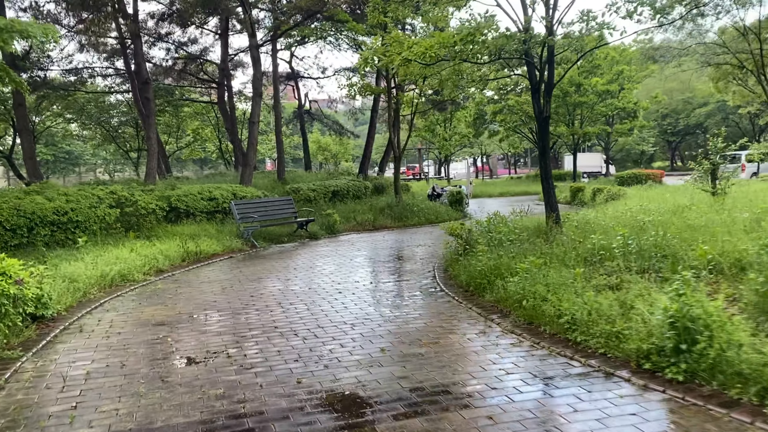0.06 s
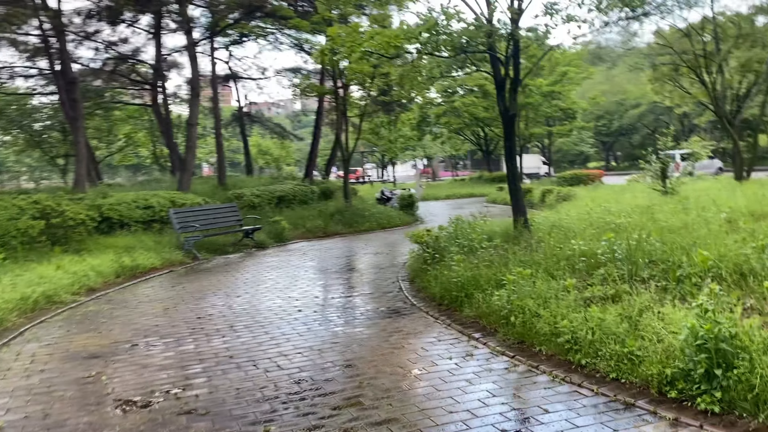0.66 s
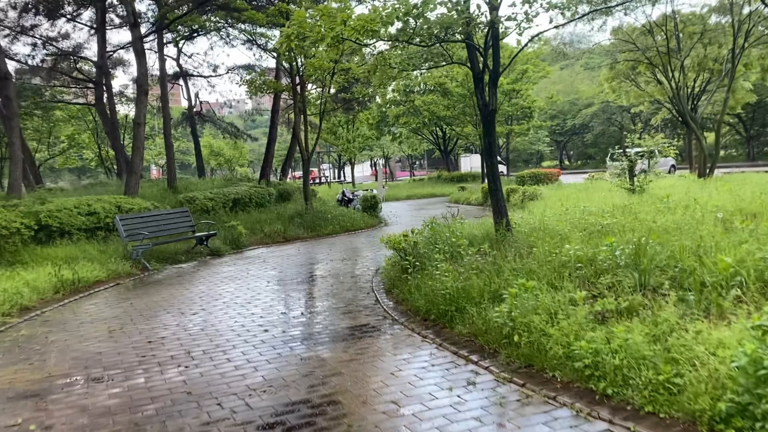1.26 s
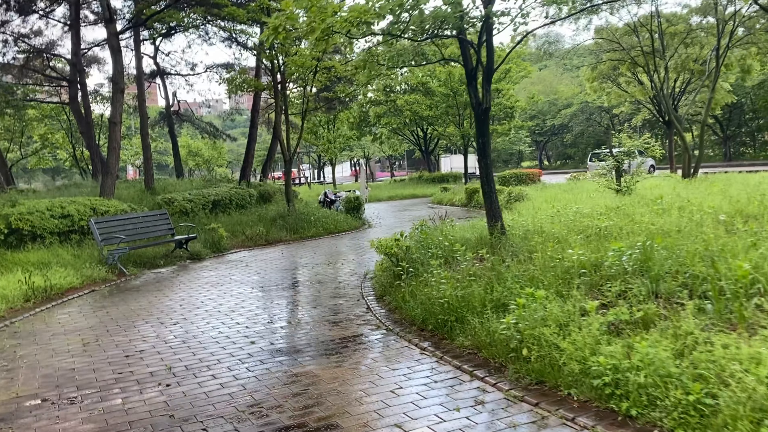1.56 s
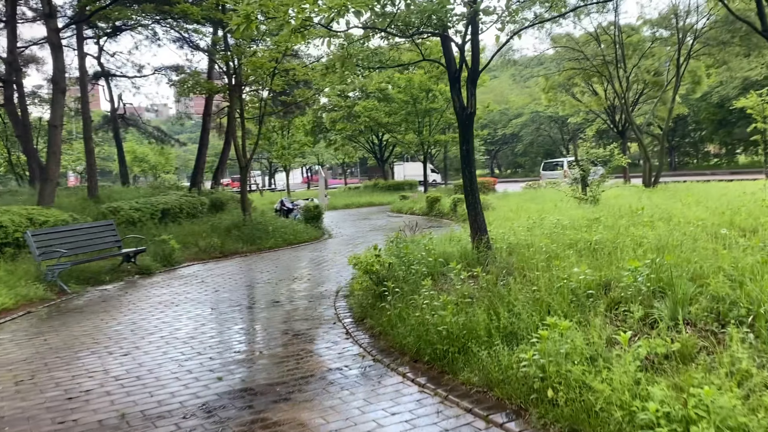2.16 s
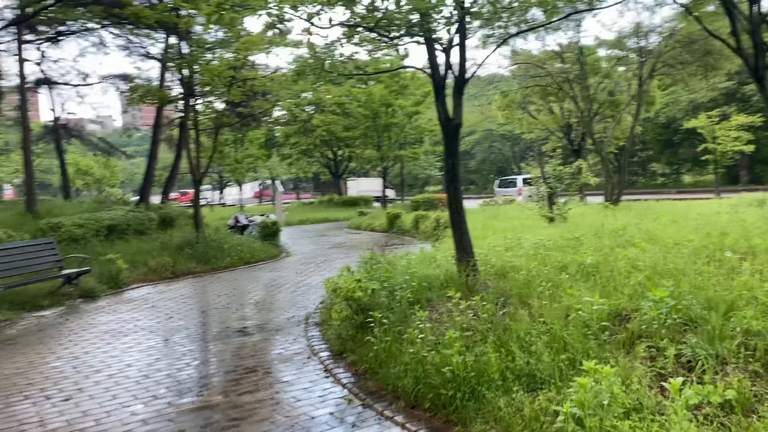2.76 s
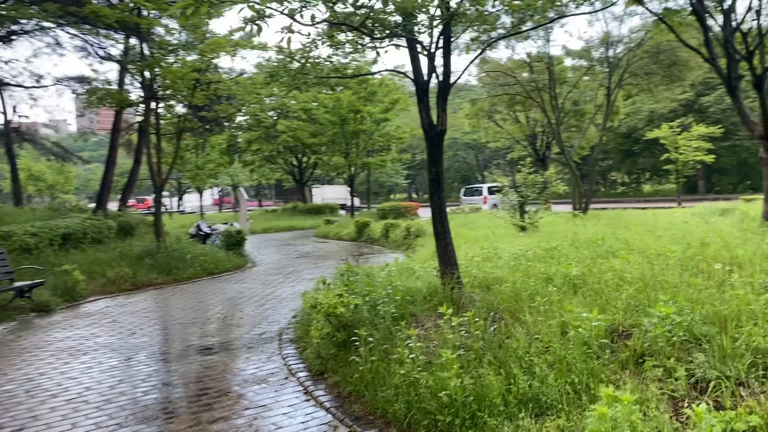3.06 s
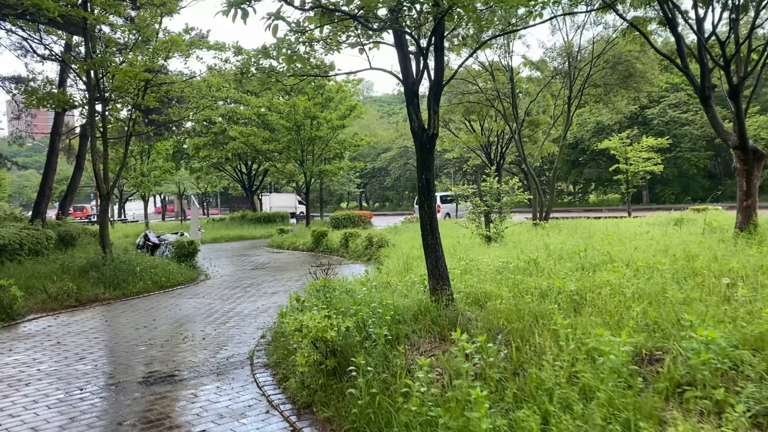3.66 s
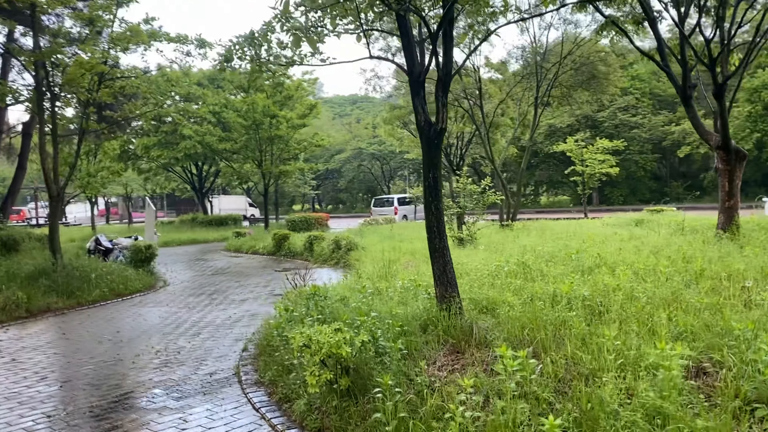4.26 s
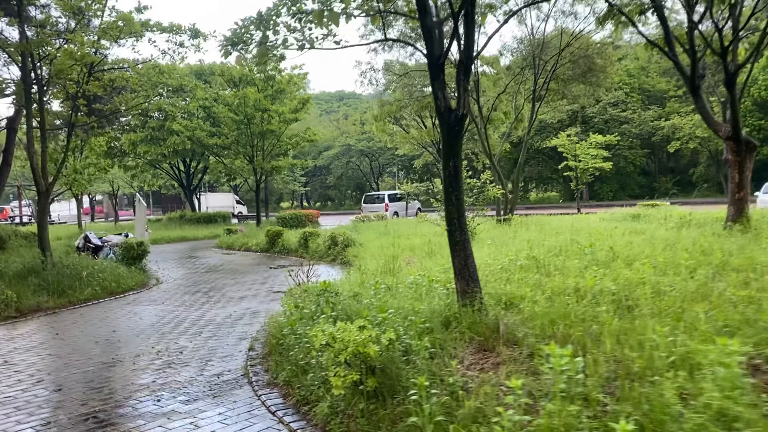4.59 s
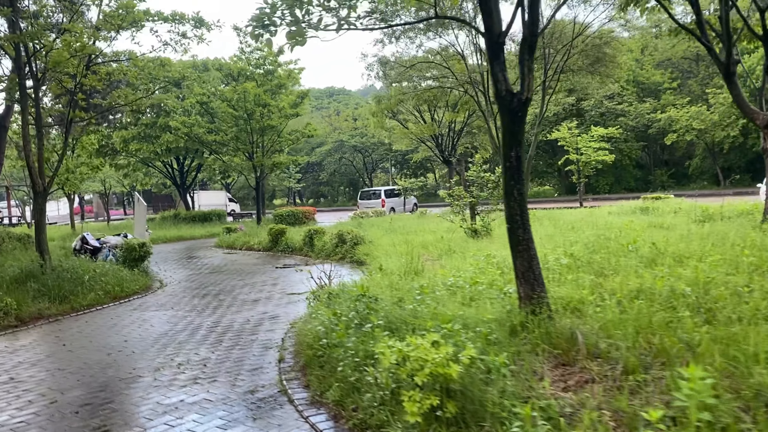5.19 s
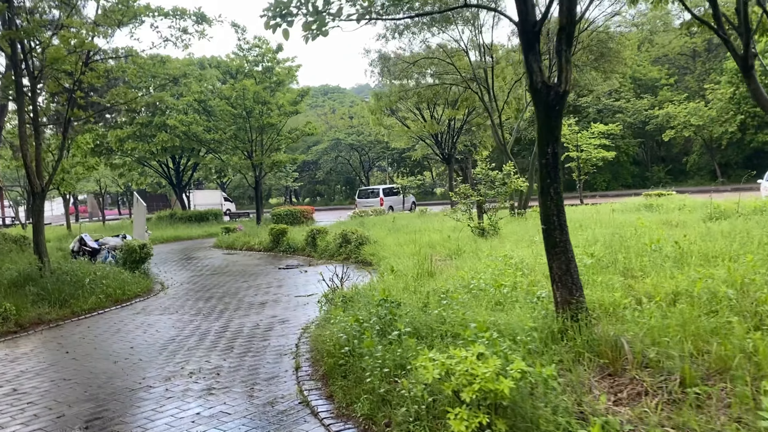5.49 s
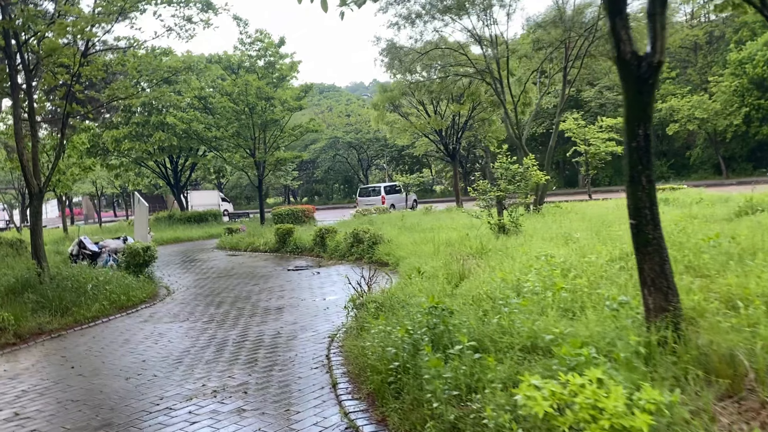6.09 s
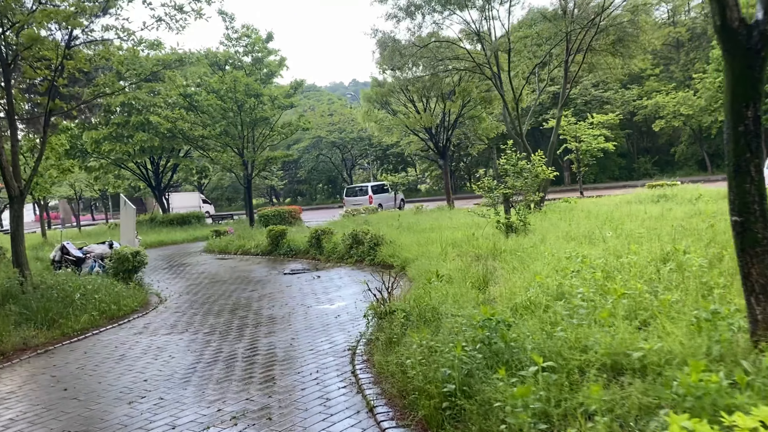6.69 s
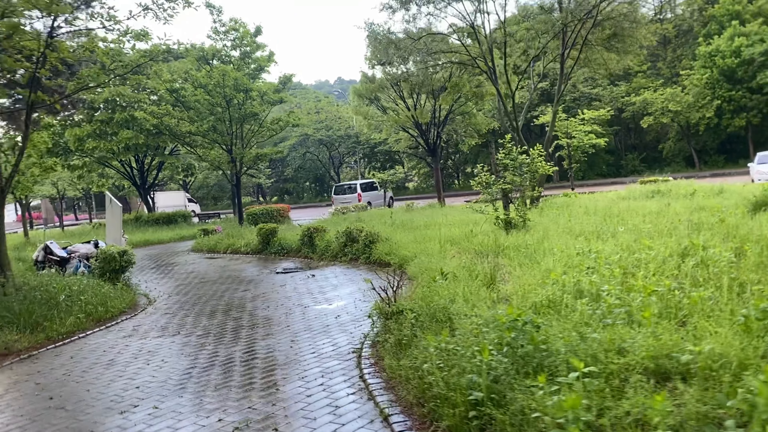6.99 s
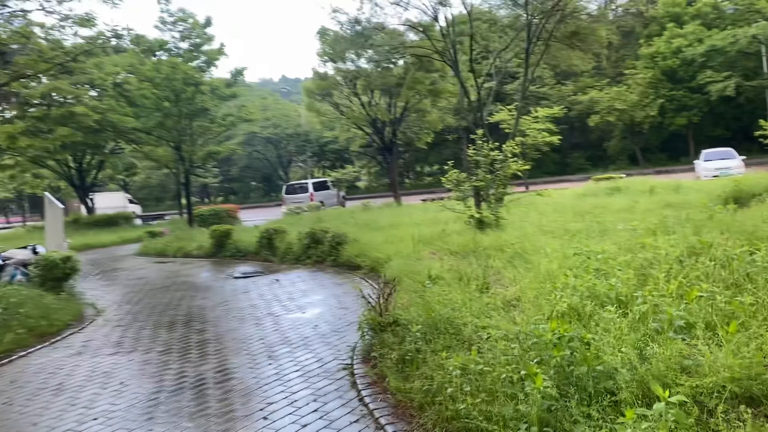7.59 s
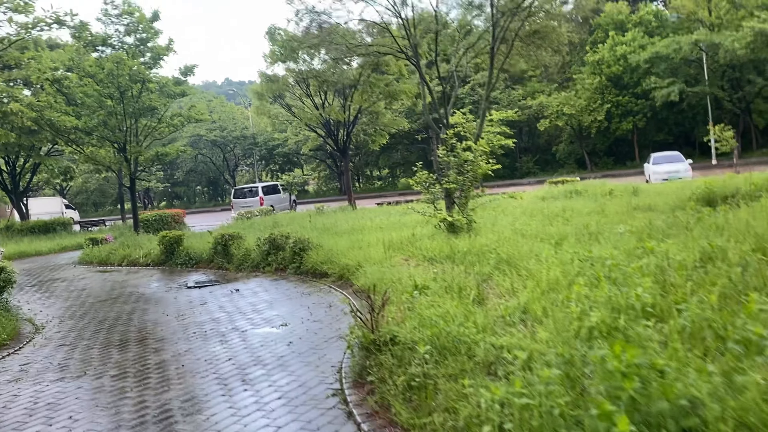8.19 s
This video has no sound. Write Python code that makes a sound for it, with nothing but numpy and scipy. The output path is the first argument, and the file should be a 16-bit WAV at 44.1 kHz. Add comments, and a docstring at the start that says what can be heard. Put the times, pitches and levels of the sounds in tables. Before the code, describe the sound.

Traffic passes on a wet road beside a park, its tyres making a continuous roar and watery hiss with faint whistling spurts. The hiss is brightest in the first half, then grows duller and quieter as the cars draw away. Distant engines drone weakly underneath. Light wind rumbles on the microphone in small puffs, and close by a few thin drips tick and several soft, dull knocks sound.

```python
"""A park beside a wet road. Passing tyres roar and the water they throw hisses, duller as the cars
draw away; single tyres whistle or sizzle out of the stream. Engines drone underneath, their firing
tones smeared by echoes from the trees. Eddies of a light wind rumble on the two microphone ports.
Close by, a few drips tick with a snap and a thin ring, and soft knocks sound."""
import sys
import numpy as np
from scipy import signal
from scipy.fft import rfft, irfft, next_fast_len
from scipy.io import wavfile
from scipy.ndimage import uniform_filter1d, map_coordinates

SR = 44100
rng = np.random.default_rng(int(sys.argv[2]) if len(sys.argv) > 2 else 0)


def unload_wav(signal):
    """Save mono or channel-first audio to the path in sys.argv[1] as 16-bit WAV at rate SR, clipped to [-1, 1]."""
    wavfile.write(
        sys.argv[1],
        SR,
        np.round(np.clip(np.atleast_2d(signal).T, -1, 1) * 32767).astype(np.int16),
    )


N = 372644

# Stereo image of the tyre noise: phase, likeness and balance between left and right.
# Each row: frequency in Hz, left phase lead in rad, coherence, left minus right level in dB.
TYRE_IMAGE = [(350, -0.3, 0.58, 0.1), (550, 2.0, 0.52, 2.9), (800, 1.8, 0.48, 2.8), (1050, 2.1, 0.78, -0.3),
              (1500, 3.4, 0.66, -4.0), (2300, 6.0, 0.8, -3.4), (3000, 7.8, 0.74, 0.3),
              (3500, 9.5, 0.25, -1.1), (4000, 12.0, 0.68, -1.2), (4500, 12.6, 0.7, -1.8),
              (5300, 15.0, 0.5, 0), (5900, 17.3, 0.25, -1.5), (6600, 18.9, 0.78, -2.1),
              (7200, 18.5, 0.6, -1.5), (8100, 17.5, 0.55, 0.3), (9000, 15.7, 0.7, 0), (11000, 12.6, 0.6, 0),
              (13100, 9.4, 0.7, 0), (15200, 6.3, 0.5, 0)]


def amp(db):
    """Decibels to gain."""
    return 10 ** (np.asarray(db) / 20)


def unit(pair):
    """Stereo pair scaled to a mid signal of rms 1."""
    return pair / np.sqrt(np.mean(pair.mean(0) ** 2) + 1e-20)


def along(rows, hz):
    """Columns of a frequency table, read at hz on a log axis."""
    row_hz, *columns = np.transpose(rows)
    return [np.interp(np.log(hz + 1), np.log(row_hz), column) for column in columns]


def curves(rows):
    """Columns of a time table, one value per sample."""
    row_s, *columns = np.transpose(rows)
    return [np.interp(np.arange(N) / SR, row_s, column) for column in columns]


def wobble(rate_hz):
    """Smooth random curve, rate_hz knots a second."""
    knots = rng.standard_normal(int(N * rate_hz / SR) + 4)
    return map_coordinates(knots, [np.arange(N) * rate_hz / SR])


def swell(peak_s, half_length_s):
    """Gaussian envelope, 1 at peak_s."""
    return np.exp(-np.minimum(((np.arange(N) / SR - peak_s) / half_length_s) ** 2, 20))


def filtered(x, response):
    """x through a complex response, given as a function of Hz."""
    size = next_fast_len(N + SR // 4)
    return irfft(rfft(x, size) * response(np.fft.rfftfreq(size, 1 / SR)), size)[..., :N]


def low_cut(x, corner_hz):
    """Fourth-order high-pass, zero phase."""
    return filtered(x, lambda hz: 1 / np.sqrt(1 + (corner_hz / (hz + 1)) ** 8))


def split(x, edges_hz):
    """Adjacent bands that sum to x, lowest first."""
    bands = []
    for edge_hz in edges_hz:
        bands.append(filtered(x, lambda hz: 1 / (1 + (hz / edge_hz) ** 16)))
        x = x - bands[-1]
    return bands + [x]


def blend(pair, coherence):
    """Two independent noises mixed to a coherence, given as a function of Hz."""
    def shares(hz):
        angle = np.arccos(np.clip(coherence(hz), 0, .98)) / 2
        return np.array([np.cos(angle), np.sin(angle)])
    mid, side = filtered(pair, shares)
    return np.array([mid + side, mid - side])


def patchy_noise(depth_db):
    """Two independent noises sharing random gain patches in time and frequency."""
    spectra = signal.stft(rng.standard_normal((2, N)), nperseg=512)[2]
    patches = uniform_filter1d(rng.standard_normal(spectra.shape[1:]), size=3, axis=0)
    patches = uniform_filter1d(patches, size=14, axis=1)
    return signal.istft(spectra * amp(depth_db * patches / patches.std()), nperseg=512)[1][:, :N]


def narrow_noise(centre_hz, width_hz):
    """Complex narrowband noise; the centre may glide."""
    sway = filtered(rng.standard_normal((2, N)), lambda hz: np.exp(-(hz / width_hz) ** 2))
    baseband = (sway[0] + 1j * sway[1]) / sway.std()
    return baseband * np.exp(2j * np.pi * np.cumsum(centre_hz * np.ones(N)) / SR)


def tyres():
    """Tread roar, ring of the horn-shaped tyre-road wedge, hiss and spray; distance dulls the top."""
    # Tyres on wet asphalt. Each row: frequency in Hz, relative density in dB.
    spectrum = [(450, -7), (700, 0), (930, 3.5), (1120, 0.8), (1400, 0.4), (1800, -2.5), (2200, -3.5),
                (2700, -7), (3150, -5), (3600, -7), (4300, -5.5), (4950, -9), (5450, -6), (5950, -10),
                (6700, -9), (8000, -17), (11500, -21.5), (15500, -32)]
    # Passing cars, loud when near. Each row: time in seconds, relative hiss level in dB.
    passes = [(0.0, -44.5), (0.3, -44), (0.8, -43.5), (1.08, -43), (1.35, -42.5), (1.65, -44.5),
              (1.92, -43.5), (2.35, -43.5), (2.6, -44.5), (3.08, -44), (3.24, -45), (3.72, -44.7),
              (4.3, -46), (4.8, -47.5), (5.38, -47), (6.1, -50.5), (6.65, -50.5), (7.1, -53.3),
              (8.45, -55.5)]
    # All cars, near and far. Each row: time in seconds, relative tread roar level in dB.
    stream = [(0.0, -46.5), (0.9, -45.7), (1.1, -45), (1.55, -46), (1.95, -44), (2.6, -46), (3.5, -47.5),
              (4.15, -47), (4.6, -48), (5.4, -47), (6.1, -49), (7.0, -51), (7.95, -52), (8.45, -50.5)]
    # Cars straight ahead, no delay between ports. Each row: time in seconds, share of the power.
    frontal = [(0, 0.035), (3.7, 0.018), (4.5, 0.24), (5.2, 0.16), (5.8, 0.13), (6.6, 0.061), (8.45, 0.17)]
    sides = np.array([[.5], [-.5]])
    aside = blend(patchy_noise(depth_db=0.9), lambda hz: along(TYRE_IMAGE, hz)[1])
    # A phase offset between left and right sets the noise off centre.
    aside = filtered(aside, lambda hz: np.exp(1j * sides * along(TYRE_IMAGE, hz)[0]))
    ahead = blend(rng.standard_normal((2, N)), lambda hz: 0.18 / (1 + (hz / 4000) ** 8))
    share = curves(frontal)[0]
    road = np.sqrt(1 - share) * aside + np.sqrt(share) * ahead
    road = filtered(road, lambda hz: amp(along(spectrum, hz)[0] + sides * along(TYRE_IMAGE, hz)[2]))
    water_film_db = 0.43 * wobble(11)
    mid_distance_db = -46
    near_db = curves(passes)[0] - mid_distance_db + water_film_db
    tread, horn, hiss, spray = split(road, edges_hz=[1800, 2520, 5000])
    out = amp(0.24 + curves(stream)[0]) * unit(tread)
    for band, base_db, slope in [(horn, -48.5, 0.87), (hiss, -46.5, 1.04), (spray, -51.5, 1.33)]:
        surge_db = 0.48 * wobble(13)
        out += amp(base_db + slope * near_db + surge_db) * unit(band)
    return low_cut(out, corner_hz=430)  # tyres make little bass


def engine(rows, waver_hz, flicker_db, octave_db, echo_db, echo_width_hz):
    """Far engine: firing tone and octave, made unsteady by the air, smeared by echoes from trees."""
    firing_hz, level_db = curves(rows)
    phase = 2 * np.pi * np.cumsum(firing_hz + waver_hz * wobble(18)) / SR
    tone = np.sqrt(2) * (np.sin(phase) + amp(octave_db) * np.sin(2 * phase))
    echoes = amp(echo_db) * narrow_noise(firing_hz, echo_width_hz).real
    return amp(level_db + flicker_db * wobble(8.6)) * (tone + echoes)


def engines():
    """Engines pulling in traffic over the low drone of a heavy one."""
    # Each row of both: time in seconds, firing tone in Hz, relative level in dB.
    pulling = [(0, 203, -58), (0.4, 200, -50), (0.75, 207, -61), (0.95, 214, -45), (1.15, 205, -50),
               (1.3, 200.2, -51), (1.58, 196.7, -46), (1.95, 172, -61), (2.27, 157.3, -47.5),
               (2.55, 157, -54), (2.82, 188, -54), (2.95, 189.5, -55), (3.2, 187.4, -52), (3.38, 183, -46),
               (3.5, 179, -56), (5.3, 111, -65), (5.85, 123.9, -58), (6.06, 130.4, -47),
               (6.25, 124.8, -58.5), (6.6, 129.7, -65)]
    drone = [(0, 55.7, -59), (2.7, 47.1, -58), (3.2, 51.9, -53), (3.65, 61.95, -51), (3.95, 64.7, -47.5),
             (4.35, 63.9, -49), (4.6, 60.35, -52), (5.25, 56.1, -45.5), (5.55, 57.7, -64), (5.9, 62.1, -45),
             (6.15, 62.1, -49), (6.6, 58, -56), (7.3, 52, -45.5), (7.8, 55, -51), (8.45, 54.8, -48)]
    cars = engine(pulling, waver_hz=3.05, flicker_db=2.5, octave_db=-19.0, echo_db=-2, echo_width_hz=24)
    heavy = engine(drone, waver_hz=1.44, flicker_db=3.0, octave_db=-13.5, echo_db=-7, echo_width_hz=10)
    return cars + heavy


def wind():
    """Eddies on the ports: large ones rumble, smaller ones buffet and flutter; puffs add power."""
    # Wind noise. Each row: frequency in Hz, relative density in dB.
    spectrum = [(20, -42), (32, -7), (42, -12), (55, 0.5), (75, -1.5), (100, 0), (140, 0), (200, -1),
                (300, -7.5), (450, -10), (650, -14), (1200, -79)]
    # Likeness at the two ports. Each row: frequency in Hz, coherence.
    coherence = [(50, 0.73), (200, 0.68), (300, 0.76), (500, 0.081)]
    # Puffs over the breeze. Each row: peak time and half length in seconds, rumble and buffet in dB.
    puffs = [(0.0, 0.038, -46, -66), (0.25, 0.05, -54, -54), (0.577, 0.063, -47, -47),
             (0.91, 0.035, -47, -40), (1.017, 0.042, -55, -41), (1.184, 0.04, -44.5, -40.5),
             (1.29, 0.03, -48, -46), (1.39, 0.02, -55, -49), (1.548, 0.044, -54, -63),
             (1.725, 0.025, -46, -38), (1.78, 0.025, -47, -40.5), (1.897, 0.037, -59, -44),
             (2.063, 0.032, -50, -44.5), (2.266, 0.053, -55, -52), (2.823, 0.035, -53, -49.5),
             (3.103, 0.06, -47, -56), (3.2, 0.03, -50, -47), (3.523, 0.077, -49, -47),
             (3.7, 0.04, -51, -45.5), (3.89, 0.053, -48, -43), (4.016, 0.051, -45.5, -43.5),
             (4.199, 0.05, -52, -51), (4.722, 0.028, -47.5, -46), (4.963, 0.07, -50, -46.5),
             (5.279, 0.25, -52, -51), (5.824, 0.057, -48, -50), (6.064, 0.09, -56, -52),
             (6.864, 0.065, -49, -51), (7.005, 0.077, -57, -49), (7.449, .15, -49, -61),
             (8.44, 0.073, -42, -51)]
    breeze_rumble_db, breeze_buffet_db, breeze_flutter_db, calming_db_per_s = -53.5, -50, -55, 0.1
    air = blend(rng.standard_normal((2, N)), lambda hz: along(coherence, hz)[0])
    air = filtered(air, lambda hz: amp(along(spectrum, hz)[0]))
    rumble, buffet, flutter = split(air, edges_hz=[90, 280])
    rumble_gain = amp(breeze_rumble_db)
    buffet_gain = amp(breeze_buffet_db - calming_db_per_s * np.arange(N) / SR)
    for peak_s, half_length_s, rumble_db, buffet_db in puffs:
        puff = swell(peak_s, half_length_s)
        rumble_gain = np.hypot(rumble_gain, amp(rumble_db) * puff)
        buffet_gain = np.hypot(buffet_gain, amp(buffet_db) * puff)
    flutter_gain = amp(breeze_flutter_db) * np.sqrt(buffet_gain / amp(breeze_buffet_db))
    eddies = rumble_gain * unit(rumble) + buffet_gain * unit(buffet) + flutter_gain * unit(flutter)
    return amp(1.5 * wobble(22)) * eddies


def drips(ring_width_hz, snap_s, snap_cut_hz):
    """Each drip lands with a dry, broad snap and leaves a thin, very high ring."""
    # Each row: start in seconds, snap in dB, ring in dB, ring pitch in Hz, ring T60 in seconds.
    landings = [(0.203, -44, -47, 15100, .09), (1.301, -57, -57, 15400, .06), (2.441, -58, -58, 15300, .08),
                (3.398, -51, -60, 13200, 0.026), (4.288, -55, -66, 9500, .02),
                (4.756, -58, -58, 15300, .08), (5.236, -47, -54, 15300, 0.021),
                (5.937, -46, -48, 15300, 0.075), (6.299, -59, -66, 15600, 0.055),
                (7.841, -59, -58, 15100, 0.065), (8.151, -63, -68, 14300, .03)]
    snap_gain, rings = np.zeros(N), np.zeros(N)
    for start_s, snap_db, ring_db, ring_hz, t60_s in landings:
        age_s = np.arange(N) / SR - start_s
        snap_gain += amp(snap_db) * swell(start_s + snap_s, snap_s)
        decay_db = np.minimum(60 * abs(age_s) / t60_s, 100)
        rings += (age_s > 0) * amp(ring_db - decay_db) * narrow_noise(ring_hz, ring_width_hz).real
    crack = blend(rng.standard_normal((2, N)), lambda hz: np.full(hz.shape, 0.5))
    return rings + snap_gain * unit(low_cut(crack, snap_cut_hz))


def tyre_whistles(pan_right_db, spurt_db):
    """Single tyres whistle or sizzle past, in spurts as they meet more or less water."""
    # Each row: peak time and half length in seconds, centre and width in Hz, relative level in dB.
    whistles = [(0.787, 0.045, 2900, 350, -45), (1.07, 0.048, 2500, 330, -42), (0.8, 0.12, 4390, 260, -51),
                (1.1, 0.091, 4380, 256, -48), (1.51, 0.055, 4210, 260, -47), (2.04, 0.2, 2160, 240, -41.5),
                (2.45, .22, 2200, 280, -47), (2.96, 0.27, 2453, 420, -47.5), (3.0, 0.21, 4400, 300, -50.5),
                (3.8, 0.33, 2597, 300, -46), (4.301, 0.25, 2734, 600, -48), (5.25, 0.41, 2950, 400, -51.5),
                (4.75, 0.72, 6700, 298.4, -58), (5.144, 0.064, 2200, 150, -50.5),
                (5.48, 0.08, 2200, 149.3, -47), (5.719, 0.17, 2215, 160, -48),
                (5.96, 0.071, 2210, 150, -49.5), (6.8, 0.25, 2227, 165, -51.5),
                (7.9, 0.99, 2163, 180.3, -59)]
    out = np.zeros((2, N))
    for peak_s, half_length_s, centre_hz, width_hz, level_db in whistles:
        lead_rad = np.array([[.5], [-.5]]) * along(TYRE_IMAGE, centre_hz)[0]
        whistle = (narrow_noise(centre_hz, width_hz) * np.exp(1j * lead_rad)).real
        out += amp(level_db) * swell(peak_s, half_length_s) * whistle
    return out * amp(np.array([[-1], [1]]) * pan_right_db + spurt_db * wobble(24))


def knocks():
    """Soft contacts with no sharp edge: brief swells of a dull resonance."""
    # Each row: time in seconds, relative peak in dB, pitch and width in Hz, half length in seconds.
    contacts = [(1.877, -39.5, 476, 330, 0.0052), (2.97, -46, 610, 61.4, 0.0063),
                (6.481, -45, 675, 65, 0.01), (7.072, -44, 432, 332, 0.016), (7.19, -46.5, 429, 217, 0.011)]
    out = np.zeros(N)
    for peak_s, peak_db, pitch_hz, width_hz, half_length_s in contacts:
        knock = swell(peak_s, half_length_s) * narrow_noise(pitch_hz, width_hz).real
        out += amp(peak_db) * knock / np.abs(knock).max()
    return out


def scene():
    """Traffic, wind and small close sounds, in stereo."""
    traffic = tyres() + tyre_whistles(pan_right_db=2.0, spurt_db=1.9) + amp(-3.5) * engines()
    ticking = drips(ring_width_hz=480, snap_s=0.0018, snap_cut_hz=7500)
    return traffic + wind() + ticking + amp(7.0) * knocks()


def record(dry):
    """Brick-wall band limit of the recorder."""
    top_hz = 15750
    return filtered(dry, lambda hz: hz < top_hz)


dry = scene()
out = record(dry)
unload_wav(out)
```